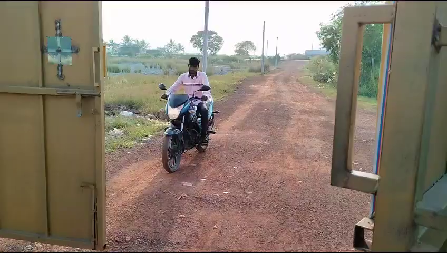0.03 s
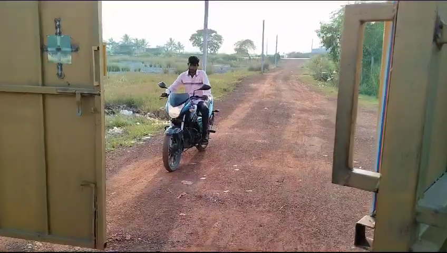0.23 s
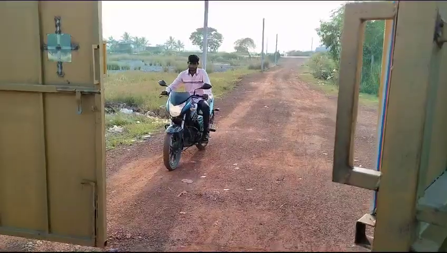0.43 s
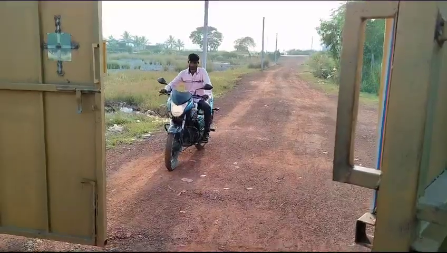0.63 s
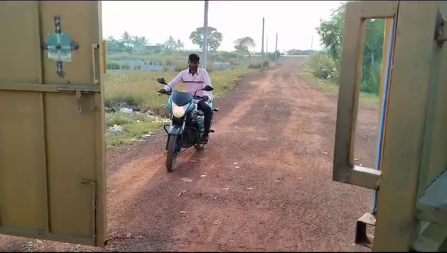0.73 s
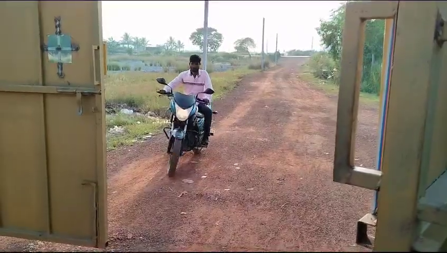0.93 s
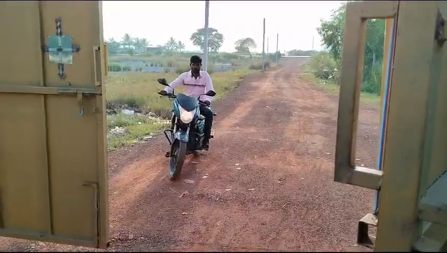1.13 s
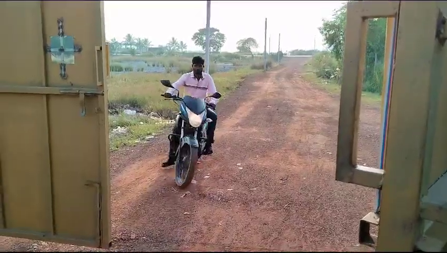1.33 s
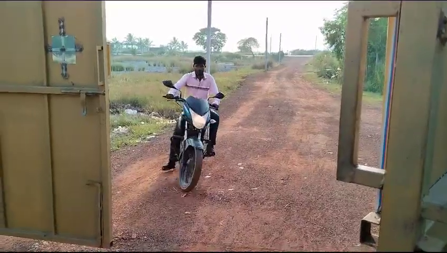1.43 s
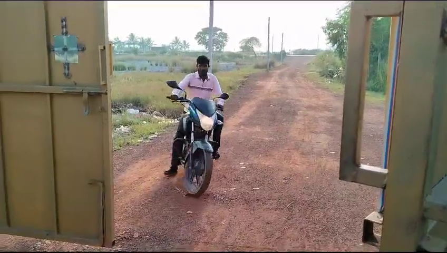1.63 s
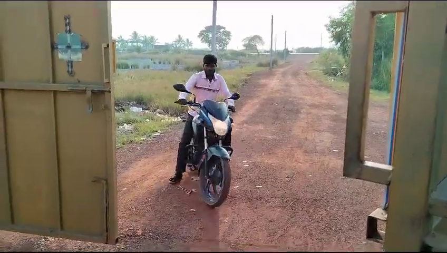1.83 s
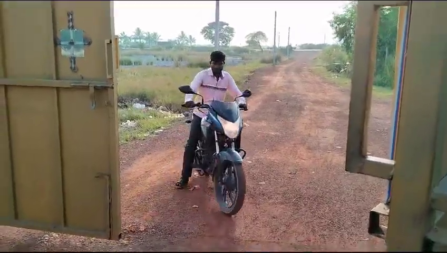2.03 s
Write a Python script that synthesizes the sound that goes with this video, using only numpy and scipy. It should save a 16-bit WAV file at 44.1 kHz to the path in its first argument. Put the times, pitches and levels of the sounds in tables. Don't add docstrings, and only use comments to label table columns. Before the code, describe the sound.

Small motorcycle rolling up a dirt yard, its brisk putter dropping to uneven idle thumps with gritty crunches.

```python
import sys
import numpy as np
from scipy import signal
from scipy.fft import rfft, irfft
from scipy.io import wavfile
from scipy.ndimage import uniform_filter1d

SR = 44100
rng = np.random.default_rng(int(sys.argv[2]) if len(sys.argv) > 2 else 0)


def how_loud(loudness_db):
    steps = np.asarray(loudness_db, float) / 20
    return 10 ** steps


def output_pcm(signal):
    pcm = np.clip(np.atleast_2d(signal).T, -1, 1) * 32767
    wavfile.write(sys.argv[1], SR, np.round(pcm).astype(np.int16))


N = 91463

# time_s, firings_per_s
ENGINE_SPEED = [(.22, 24.6), (.35, 25.3), (.48, 25.6), (.57, 24.3), (.63, 23.7), (.69, 22.7), (.75, 22.5),
                (.8, 21.2), (.86, 20.2), (.9, 18.2), (.94, 16.8), (.98, 16.5), (1.02, 15.0), (1.06, 14.3),
                (1.09, 12.9), (1.14, 12.6), (1.2, 10.3), (1.45, 9.9), (1.7, 8.9), (2.07, 13)]
# time_s, casing_level_db, exhaust_relative_db, whine_relative_db
EFFORT_HEARD = [(.23, -37, 5, 1), (.4, -34.5, -1.5, 0), (.52, -34, 3, 1.5), (.64, -34.5, 4, 2),
                (.74, -36, -6, 7), (.86, -36, 4.5, 1), (1.0, -39.5, -6, -3), (1.15, -42, -4.5, -1.5),
                (1.35, -42.5, -10.5, 1.5), (1.55, -42, 8.5, -2.5), (1.7, -43.5, 7.5, -37),
                (1.83, -41, 5, -1), (1.91, -39.5, 4, -12), (1.95, -41.5, 8, 1), (1.99, -38, 3.5, -28),
                (2.07, -38.5, 4, -23)]
# pitch_hz, width_hz, level_db
SILENCER_MODES = [(116.6, 39, -3), (151, 26.3, 7.5), (248.5, 41, -2), (315.5, 120, -4.5)]
# start_s, level_db
IDLE_FIRINGS = [(1.334, -4), (1.42, 7), (1.459, 0.5), (1.51, -9), (1.634, -10), (1.683, -12), (1.745, 0),
                (1.852, 0), (1.891, -7), (1.942, 3.5), (2.018, 3)]
# multiple_of_mesh_rate, level_db, noisy_share_0_to_1
MESH_TONES = [(.6, -12, .7), (.775, -8, .5), (.9, -4, .3), (1, -1, .2), (1.15, -14, .6), (2, 2, .1),
              (2.85, -6, .3), (3, -1, .15), (3.8, -9, .4), (4, -1, .2), (6, -16, .6)]
# pitch_hz, width_hz, boost_db
GEARBOX_COLOUR = [(869, 140, 11), (1058.6, 83, 15), (1354, 320, 12), (1670, 196, -8), (2035, 160, 8),
                  (2860, 190, 11.5), (3830, 550, 9.5), (2310, 420, 8)]
# pitch_hz, level_db_per_hz
CASING_SPECTRUM = [(25, -27.5), (70, -18), (150, -3.5), (330, -9), (550, -15), (1500, -10), (4200, -21),
                   (8000, -22.5)]
# pitch_hz, width_hz, boost_db
COVER_MODES = [(833, 310, 8.5), (1296, 105, 4.5), (2630, 170, 7), (3577, 200, 7.5), (5430, 620, 12),
               (463, 140, -2.5), (1463, 267, -10.5)]
# pitch_hz, left_right_likeness
STEREO_LIKENESS = [(60, 0.97), (250, 0.92), (600, 0.63), (1200, 0.2), (2500, 0.28), (4500, 0.73),
                   (9000, 0.034)]
# pitch_hz, width_hz, level_db
FIN_MODES = [(960, 100, -5.5), (1233, 59, -11), (2493, 100, 3), (3620, 56, 5), (4330, 15, 2),
             (5440, 47, -1.5)]
# start_s, length_s, level_db
CHAIN_SLAPS = [(.995, .025, -43), (1.145, .04, -45), (1.397, .04, -47), (1.46, .05, -47),
               (1.925, .008, -36), (1.937, .033, -39), (1.993, .01, -43), (2.008, .018, -37),
               (2.0345, .011, -34), (2.056, .02, -39)]
# pitch_hz, width_hz, level_db
SLAP_RINGS = [(935, 310, -1), (2526, 200, 1), (3540, 210, 2.5), (4130, 240, 2), (5600, 1170, -3.5),
              (7120, 1100, -9.5)]
# start_s, length_s,
# pitch_hz, level_db
HUM_TONES = [(.24, .5, 124, -49), (.32, .29, 152, -41.5), (.33, .2, 329, -48), (.24, .1, 365, -49),
             (.25, .09, 296, -48), (.54, .11, 294, -43), (.52, .07, 176, -46), (.605, .08, 169, -41),
             (.56, .13, 335, -50), (.69, .1, 362, -49), (.74, .17, 250, -48), (.79, .06, 170, -45),
             (1.11, 0.065, 489, -47), (1.195, .09, 250, -49), (1.316, 0.074, 161.8, -43)]
# start_s, peak_db, pitch_hz, left_minus_right_db
STONES = [(1.147, -33, 5800, -1), (1.1694, -33, 1740, 0), (1.178, -32, 1840, -2), (1.2034, -32, 1990, 3),
          (1.2106, -32, 1710, 2), (1.2477, -32, 2780, 1.5), (1.2594, -34, 4500, 1),
          (1.2975, -32, 2470, 2.5), (1.3284, -35, 2390, 2), (1.344, -36, 2480, 0), (1.3964, -36, 2430, 1),
          (1.467, -29, 4400, -1), (1.477, -29, 3460, 1), (1.5092, -29, 2900, 2), (1.5615, -35, 3510, 1),
          (1.6214, -38, 3640, 0), (1.6817, -27, 3000, -2), (1.6855, -33, 2300, 1), (1.692, -25, 2900, 3),
          (1.7442, -36, 3700, 1.5), (1.7645, -37, 3000, 1.5), (1.8087, -29, 3630, 2),
          (1.9687, -27, 1500, 2), (2.0123, -31, 3670, 0), (2.02, -29, 1300, 0), (2.0384, -29, 3650, 0),
          (2.0422, -28, 2500, 0)]
# delay_s, left_db, right_db
YARD_ECHOES = [(.004, -15, -17), (.009, -18, -16), (.017, -19, -21), (.031, -22, -21)]
# pitch_hz, level_db
AIR_SPECTRUM = [(8300, 2), (8900, -6.5), (9400, -23), (9900, -10), (10400, -9), (11900, -2), (13000, -12),
                (15500, -10)]
# pitch_hz, left_minus_right_db
MIC_LEAN = [(60, -.8), (200, -.3), (420, 2.5), (770, -.5), (1200, 2.5), (2740, 3.5), (6400, -4.5),
            (15000, -7)]
# pitch_hz, left_lead_radians
MIC_LEAD = [(100, -.05), (1000, -.25), (1750, -.1), (2400, -.6), (3100, -1.5), (3800, -1.5), (5200, -2.5),
            (6600, -3.3)]

START_S, TOP_HZ = .2283, 7584
FIRING_AT_S, IDLE_FROM_S = .635, 1.3
FIRING_SPREAD_DB, FIRING_JITTER_S = 2, .0006
REBOUND_DB, REBOUND_AT_CYCLES = -13, .5
EXHAUST_DB, PUFF_DB, WHINE_DB, CASING_DB, FINS_DB = -9, -14.5, -4, -2, -11.5
TEETH_PER_FIRING, CRANK_RIPPLE_RAD = 40, 0.08
MESH_THROB, MESH_BLUR_HZ, MESH_FADES_BELOW_HZ = .55, 35, 270
MESH_LOOSENS_BELOW_HZ = 560
CASING_THROB_DB, THROB_DECAY_CYCLES = -3, 1
IDLE_GAP_HZ, IDLE_GAP_WIDTH_HZ, IDLE_GAP_DB, IDLE_GAP_BELOW_PER_S = 520, 280, -15.5, 9.4
GRIT_T60_S, GRIT_DB, SNAP_DB = 0.0043, -1, 0
CRUNCH_PER_S, CRUNCH_DB = 150, -21.5
AIR_DB, AIR_PATCH_DB, AIR_GAP_DB, AIR_HOLD_S = -25.5, 4, -25, 1024 / 44100
AIR_FOLLOWS, AIR_SPEED_POWER = 1.1, 1


def in_time(rows):
    s, *columns = np.transpose(rows)
    return [np.interp(np.arange(N) / SR, s, c) for c in columns]


def at_hz(points, hz):
    return np.interp(np.log(hz), np.log(np.array(points)[:, 0]), np.array(points)[:, 1])


def rms_one(x):
    return x / np.sqrt(np.mean(x ** 2) + 1e-20)


def drift(hz):
    r = np.exp(-2 * np.pi * hz / SR)
    return rms_one(signal.lfilter([1], [1, -2 * r, r * r], rng.standard_normal(N + 20000))[20000:])


def resonate(x, hz, width_hz):
    r = np.exp(-np.pi * width_hz / SR)
    zeros = np.array([1, 0, -1]) * (1 - r * r) / 2
    poles = [1, -2 * r * np.cos(2 * np.pi * hz / SR), r * r]
    return signal.lfilter(zeros, poles, x + 1e-18)


def cut(x, hz, kind, order=2):
    return signal.sosfilt(signal.butter(order, hz, kind, fs=SR, output="sos"), x)


def alternating(x, modes):
    return sum(how_loud(db) * (-1) ** k * resonate(x, hz, w) for k, (hz, w, db) in enumerate(modes))


def bumps_db(hz, modes):
    return sum(db / (1 + (2 * (hz - f) / w) ** 2) for f, w, db in modes)


def cycles():
    count = np.cumsum(in_time(ENGINE_SPEED)[0]) / SR
    return count - count[int(FIRING_AT_S * SR)]


def silencer(x):
    ringing = cut(alternating(x, SILENCER_MODES), 123, "high", order=2)
    return rms_one(cut(ringing, 356, "low", order=3))


def exhaust(cycle):
    draws, clicks = rng.standard_normal((60, 4)), np.zeros(N)
    running = cycle[:int(IDLE_FROM_S * SR)]
    for lag, db, col in ((0, 0, 0), (REBOUND_AT_CYCLES, REBOUND_DB, 2)):
        at = np.flatnonzero(np.diff(np.floor(running - lag)) > 0)
        d = draws[:len(at)]
        jitter = (d[:, col] * FIRING_JITTER_S * SR).astype(int)
        clicks[np.clip(at + jitter, 0, N - 1)] -= how_loud(db + FIRING_SPREAD_DB * d[:, col + 1])
    for s, db in IDLE_FIRINGS:
        clicks[int(s * SR)] -= how_loud(db)
    puff = rng.standard_normal(N) * (.5 + np.exp(-(cycle % 1) / .25))
    return how_loud(EXHAUST_DB) * silencer(clicks) + how_loud(PUFF_DB) * silencer(puff)


def gear_whine(cycle):
    out, rate = 0, np.gradient(cycle) * SR * TEETH_PER_FIRING
    loose = 1 / (1 + (rate / MESH_LOOSENS_BELOW_HZ) ** 4)
    for k, db, noisy in MESH_TONES:
        ripple = k * CRANK_RIPPLE_RAD * np.sin(4 * np.pi * cycle)
        phase = 2 * np.pi * round(k * TEETH_PER_FIRING) * cycle + ripple
        noisy = noisy + (1 - noisy) * loose
        throb = 1 + MESH_THROB * np.cos(4 * np.pi * cycle + k) + 0.17 * np.cos(2 * np.pi * cycle + 2 * k)
        blur = drift(MESH_BLUR_HZ) * np.cos(phase) + drift(MESH_BLUR_HZ) * np.sin(phase)
        clean = np.sqrt(2) * np.cos(phase + .5 * drift(13.0)) * how_loud(drift(17))
        fade = how_loud(bumps_db(k * rate, GEARBOX_COLOUR)) / (1 + (MESH_FADES_BELOW_HZ / rate) ** 6)
        out = out + how_loud(db) * fade * throb * (np.sqrt(noisy) * blur + np.sqrt(1 - noisy) * clean)
    return how_loud(WHINE_DB) * rms_one(out)


def casings(cycle):
    out, together, edges = 0, drift(0.56), 30 * 2 ** np.arange(0, 8.2, 1 / 4)
    white = rng.standard_normal((2, 2, N)) * how_loud(1.34 * drift(690))
    jump = np.exp(-(cycle % 1) / THROB_DECAY_CYCLES)
    gap_db = IDLE_GAP_DB / (1 + (np.gradient(cycle) * SR / IDLE_GAP_BELOW_PER_S) ** 6)
    flicker = [drift(34) for k in range(5)]
    for k, (low, high) in enumerate(zip(edges, edges[1:])):
        mid, side = cut(white[k % 2], [low, high], "band")
        hz = np.sqrt(low * high)
        alike = np.clip(at_hz(STEREO_LIKENESS, hz), -1, 1)
        colour_db = at_hz(CASING_SPECTRUM, hz) + bumps_db(hz, COVER_MODES)
        hollow_db = gap_db / (1 + (2 * (hz - IDLE_GAP_HZ) / IDLE_GAP_WIDTH_HZ) ** 2)
        gain = how_loud(colour_db + hollow_db + CASING_THROB_DB * jump + together + 2.44 * flicker[k % 5])
        out = out + gain * (np.sqrt(1 + alike) * mid + np.sqrt(1 - alike) * side * [[1], [-1]])
    return how_loud(CASING_DB) * rms_one(out)


def fins(cycle):
    ticks = rng.standard_normal((3, N)) * how_loud(4.1 * drift(360) + 4 * np.exp(-(cycle % .5) / 0.044))
    ticks = ticks[0] + 0.32 * ticks[1:]
    ringing = sum(how_loud(db + 2 * drift(16)) * resonate(ticks, hz, w) for hz, w, db in FIN_MODES)
    return how_loud(FINS_DB) * rms_one(ringing)


def clatter():
    t, runs = np.arange(N) / SR, 0
    for s, length, db in CHAIN_SLAPS:
        shape = np.minimum((t - s) * 1000, 1 + (s + length - t) / 0.015)
        runs = runs + how_loud(db) * np.clip(shape, 0, 1)
    knocks = rng.standard_normal((3, N)) * how_loud(2.9 * drift(310))
    knocks = knocks[0] + .5 * knocks[1:]
    return runs * rms_one(alternating(knocks, SLAP_RINGS))


def buzzes():
    t, out = np.arange(N) / SR, 0
    for s, length, hz, db in HUM_TONES:
        swell = np.clip(np.minimum(t - s, s + length - t) / (0.12 * length), 0, 1)
        out = out + how_loud(db + drift(6)) * np.sqrt(2) * np.sin(2 * np.pi * hz * t) * swell
    return out


def grit(level):
    out = np.zeros((2, N))
    for s, db, hz, pan_db in STONES:
        click = np.zeros(N)
        click[int(s * SR)] = how_loud(db + GRIT_DB) * 4.45
        crack = resonate(click, hz, 1.74 / GRIT_T60_S) * 3 + how_loud(SNAP_DB) * resonate(click, 3300, 4600)
        out += crack * how_loud(np.array([[.5], [-.5]]) * np.clip(pan_db, -4, 4))
    sizes = how_loud(3.1 * np.minimum(rng.exponential(1, N), 4)) * rng.choice([-1, 1], N)
    sizes = sizes * (rng.random(N) < CRUNCH_PER_S / SR)
    dealt, small = rng.integers(0, 8, N), 0
    for k, hz in enumerate(np.geomspace(1200, 6000, 8)):
        pan = how_loud(np.array([[1], [-1]]) * (k % 3 - 0.5) * 2)
        small = small + resonate(sizes * (dealt == k), hz, hz / 3) * pan
    return out + level * how_loud(CRUNCH_DB) * rms_one(small)


def yard(x):
    dull, out = cut(x, 4500, "low"), x
    for s, left_db, right_db in YARD_ECHOES:
        out = out + how_loud(np.array([[left_db], [right_db]])) * np.roll(dull, int(s * SR))
    return out


def air(near, cycle):
    below = np.sqrt(uniform_filter1d(cut(near, [4500, 7500], "band") ** 2, size=1500).mean(0) + 1e-12)
    below = below * (below / below.mean()) ** (AIR_FOLLOWS - 1)
    below = below * (np.gradient(cycle) * SR / 20) ** AIR_SPEED_POWER
    white, edges, out = rng.standard_normal((2, 2, N)), np.arange(8100, 15900, 430), 0
    held = (np.arange(N) // (AIR_HOLD_S * SR) * AIR_HOLD_S * SR).astype(int)
    for k, (low, high) in enumerate(zip(edges, edges[1:])):
        chance = drift(13)[held]
        patch = uniform_filter1d(how_loud(AIR_PATCH_DB * chance + AIR_GAP_DB * (chance < -0.9)), size=300)
        band = cut(white[k % 2], [low, high], "band", order=4)
        out = out + how_loud(at_hz(AIR_SPECTRUM, (low + high) / 2)) * patch * band
    return how_loud(AIR_DB) * below * rms_one(out)


def scene():
    level_db, exhaust_db, whine_db = in_time(EFFORT_HEARD)
    cycle = cycles()
    engine = how_loud(level_db + exhaust_db) * exhaust(cycle)
    engine = engine + how_loud(level_db + whine_db) * gear_whine(cycle) + buzzes()
    rattle = how_loud(level_db) * casings(cycle) + how_loud(.5 * level_db - 20.5) * fins(cycle) + clatter()
    near = yard(engine) * 0.74 + rattle + grit(how_loud(level_db))
    return cut(near, TOP_HZ, "low", order=20) + air(near, cycle)


def band_limit(x):
    return signal.sosfilt(signal.butter(12, 15800, fs=SR, output="sos"), x)


def record(dry):
    hz = np.maximum(np.arange(N // 2 + 1) * SR / N, 10)
    half = how_loud(at_hz(MIC_LEAN, hz) / 2) * np.exp(.5j * at_hz(MIC_LEAD, hz))
    ports = irfft(rfft(dry) * [half, 1 / half], N)
    return band_limit(ports * (np.arange(N) >= START_S * SR))


dry = scene()
out = record(dry)
output_pcm(out)
```